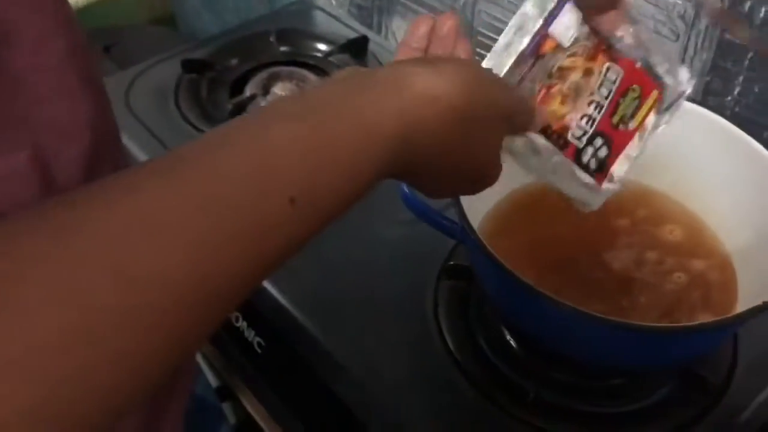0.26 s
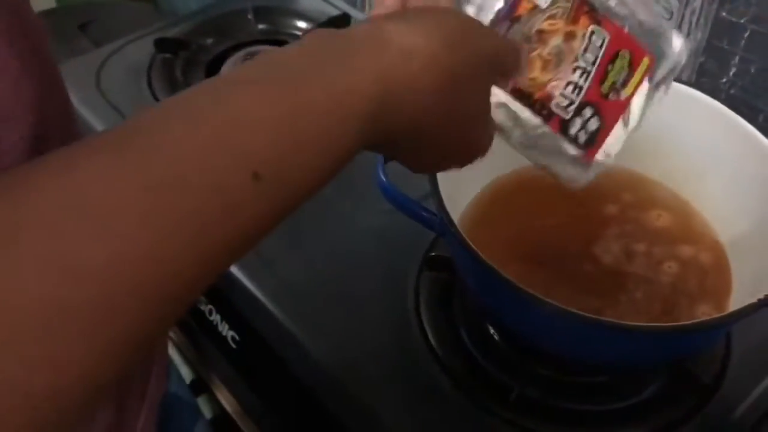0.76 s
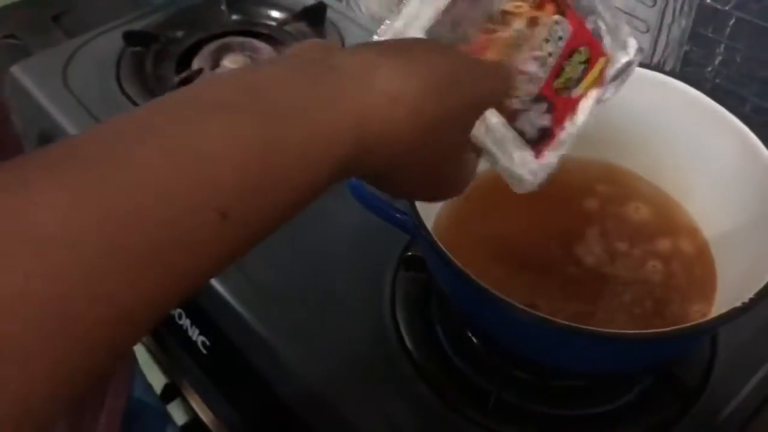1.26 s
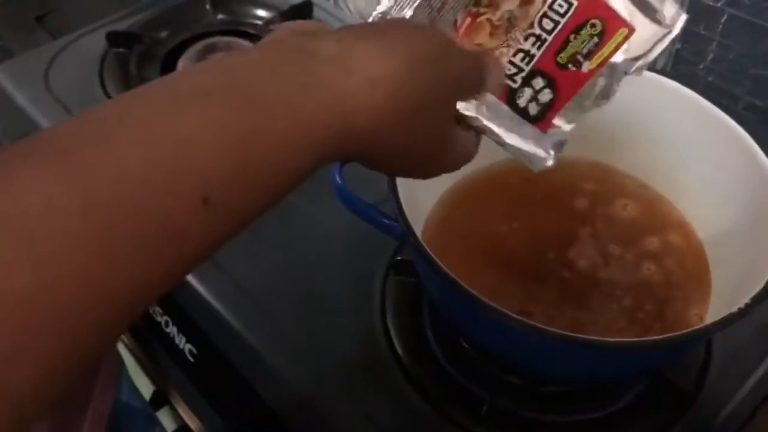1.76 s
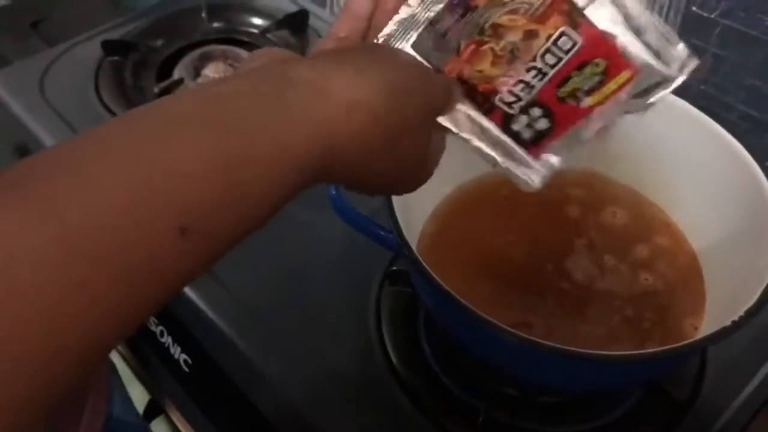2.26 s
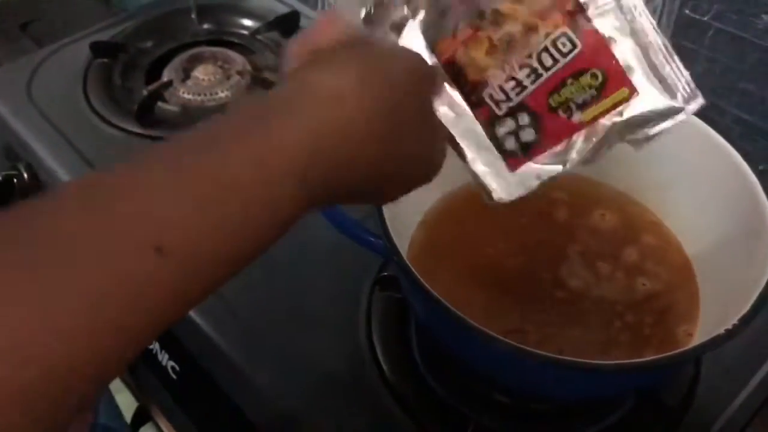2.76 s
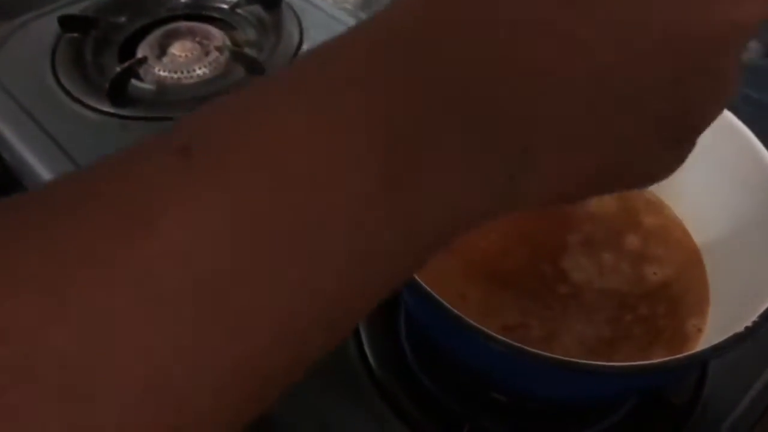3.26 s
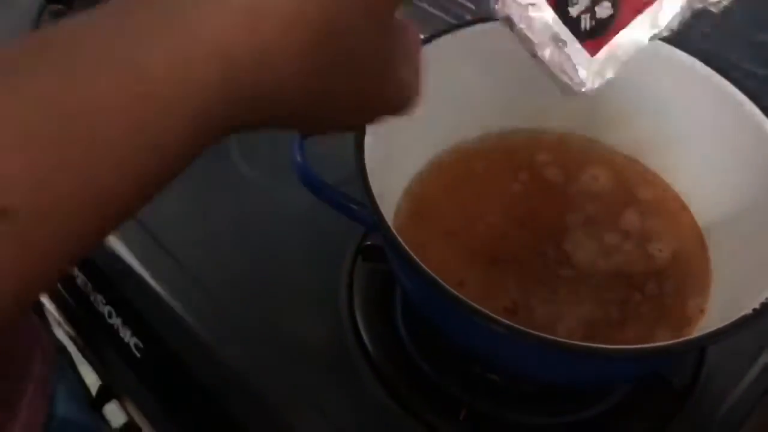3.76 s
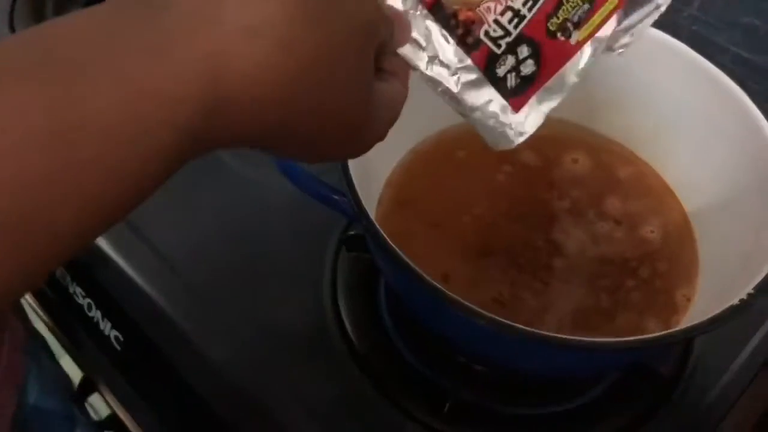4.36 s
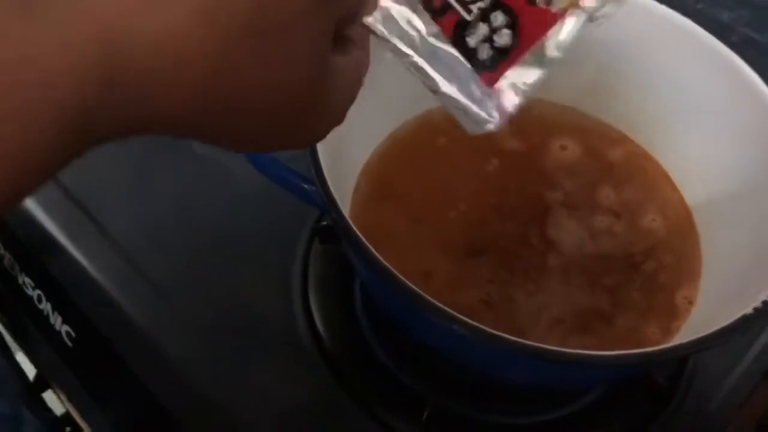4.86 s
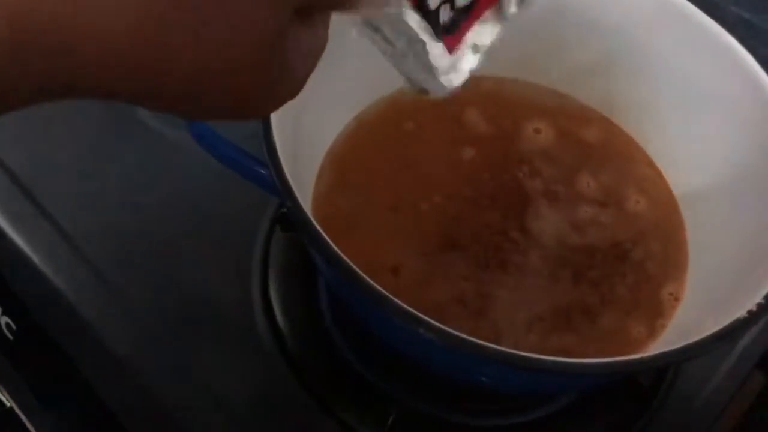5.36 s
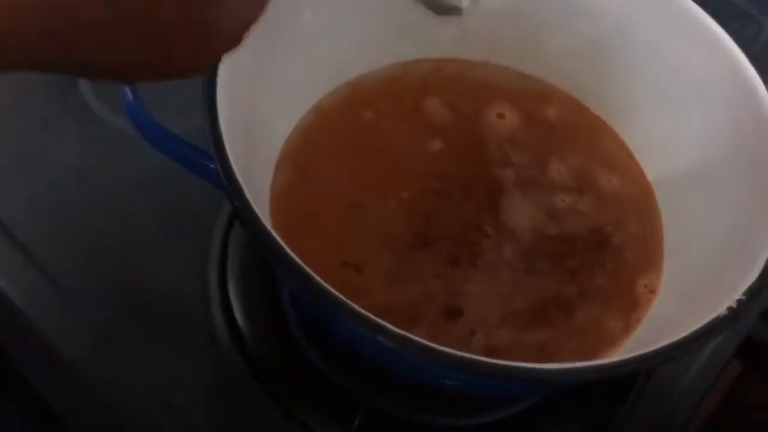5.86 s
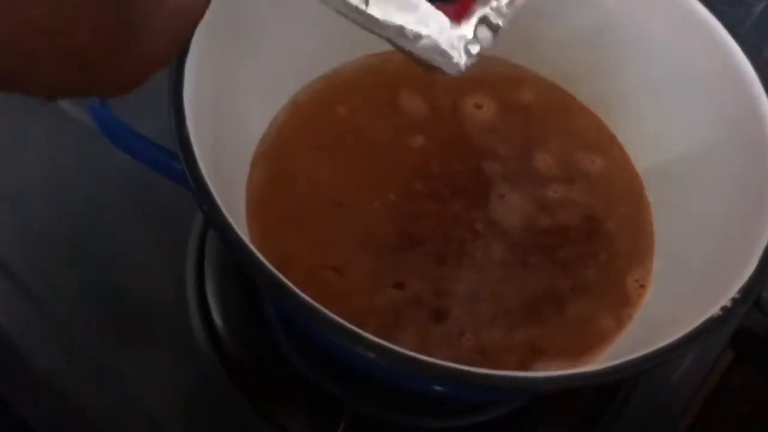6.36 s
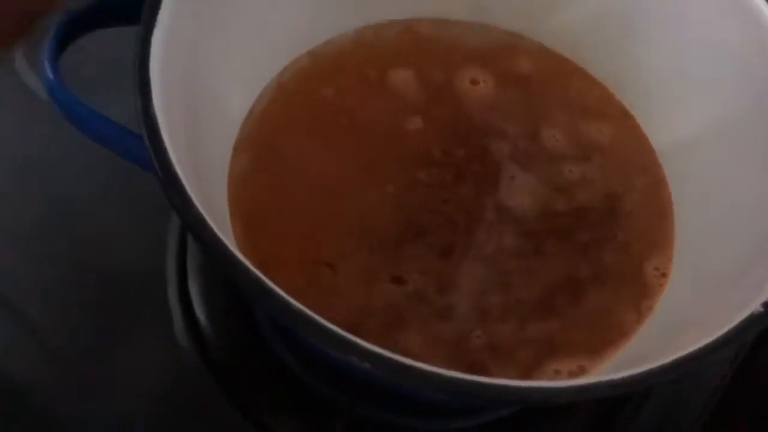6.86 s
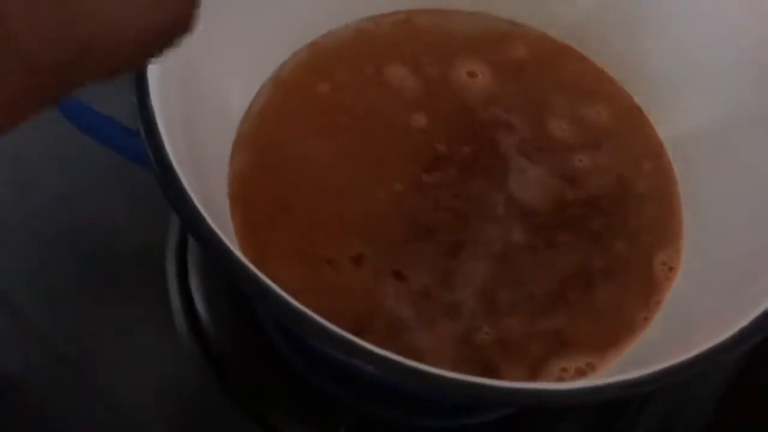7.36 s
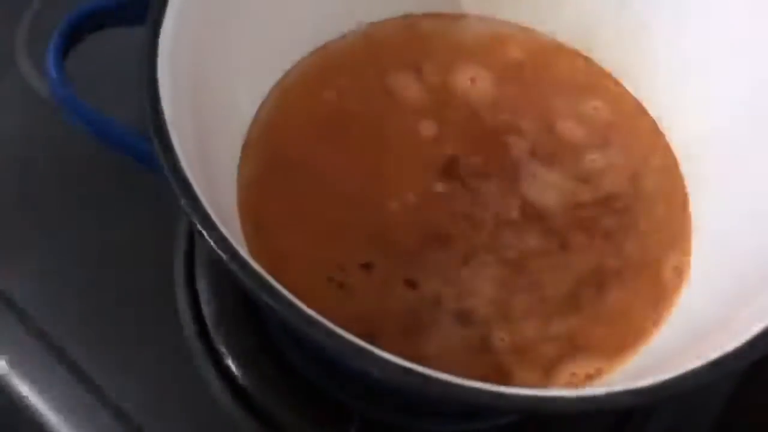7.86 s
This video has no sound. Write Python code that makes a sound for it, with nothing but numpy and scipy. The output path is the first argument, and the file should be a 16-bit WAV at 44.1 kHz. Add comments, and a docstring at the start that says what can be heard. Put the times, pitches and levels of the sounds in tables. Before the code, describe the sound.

Crisp metallic foil crackling as a sachet is squeezed and shaken, peaking in hard snaps before fading to a steady, low fan hum.

```python
"""Small kitchen, a phone's microphone close to a foil sachet squeezed and shaken over an open pot.
From first to last a fan hums on the mains, with faint shaft tones and a soft noise of moving air.
For the first 4 s creases in the foil buckle in sharp snaps over tiny crackles; hard walls add a short tail.
The pot's low answer sinks towards 4 s and is back by 4.6 s; most of the hardest snaps follow, up to 7 s.
Then only a few weak snaps and thin crackles are left over the fan."""
import sys
import numpy as np
from scipy import signal
from scipy.fft import rfft, irfft
from scipy.io import wavfile
from scipy.ndimage import uniform_filter1d

SR = 44100
rng = np.random.default_rng(int(sys.argv[2]) if len(sys.argv) > 2 else 0)


def inscribe(sig):
    """Save sig as 16-bit PCM at rate SR to the path in sys.argv[1].

    A 1-D sig is mono; a 2-D sig holds one channel per row.
    Samples are clipped to [-1, 1] before scaling.
    """
    pcm = np.round(np.clip(np.atleast_2d(sig).T, -1, 1) * 32767)
    wavfile.write(sys.argv[1], SR, pcm.astype(np.int16))


def ratio(d):
    """dB to gain"""
    e = np.asarray(d, float) / 20
    return 10 ** e


N = 357651
T = np.arange(N) / SR
TOP_HZ = 15900  # top of the microphone's band, and the highest patch pitch


def resonance(f, hz, width):
    """Response of a damped resonator, gain 1 at its centre."""
    return 1j * f * width / (hz ** 2 - f ** 2 + 1j * f * width + 1e-9)


def curve(points):
    """Straight lines through (time, level) points, as a gain over the whole scene."""
    return ratio(np.interp(T, *np.transpose(points)))


def walk(rate):
    """Random levels held 1 / rate s and slewed twice; spread near 1."""
    hold = int(SR / rate)
    steps = np.repeat(rng.standard_normal(N // hold + 1), hold)
    return 1.56 * uniform_filter1d(uniform_filter1d(steps, hold), hold)[:N]


# mains tones of the fan: (pitch [Hz], rms level at the start [dB], change [dB per s])
MAINS_TONES = [(99.97, -42, -.1), (299.9, -50.5, -.8)]


def mains_hum():
    """Mains-driven tones of steady pitch whose levels drift down slowly."""
    tones = 0
    for hz, db, change in MAINS_TONES:
        tones = tones + ratio(db + change * T) * np.sin(2 * np.pi * (hz * T + rng.random()))
    return np.sqrt(2) * tones


# overtones of the turning shaft: (multiple of the turn rate, rms level before swing and swell [dB])
SHAFT_TONES = [(8, -55), (12, -60), (14, -61), (16, -61), (20, -63), (22, -64)]
# slow growth of the shaft tones: (time [s], level [dB])
SHAFT_SWELL = [(0, -2), (8.1, 2)]


def shaft_tones():
    """Overtones locked to one turning shaft: its speed wanders, each tone's level swings by itself."""
    turns_per_s = 18.64 * (1 + 0.00139 * walk(1.972))
    turns = np.cumsum(turns_per_s) / SR
    tones = 0
    for multiple, db in SHAFT_TONES:
        swing_db = 1.9 * walk(2.355)
        tones = tones + ratio(db + swing_db) * np.sin(2 * np.pi * (multiple * turns + rng.random()))
    return np.sqrt(2) * tones * curve(SHAFT_SWELL)


# spectral shape of the room and fan noise: (frequency [Hz], relative density [dB per Hz])
AIR_SHAPE = [(18, -69), (30, -24.5), (70, -11.5), (81, -17), (103, -6.5), (124, -12), (153, -9),
             (319, -12.5), (600, -15), (889, -19.5), (1130, -25.5), (1500, -30), (3500, -37), (16000, -49)]
# unsteady middle of that noise: (centre [Hz], width [Hz], spread [dB], changes [per s])
AIR_FLICKER = (750, 1700, 2.03, 7)
# slow rise and fall of that noise: (time [s], level [dB])
AIR_SWELL = [(0, -1), (3.5, 0), (4.8, 1), (6.6, 0.7), (7.6, -1.4)]


def air():
    """Smooth noise of the room and the fan's airflow, its middle band flickering on its own."""
    shape_hz, shape_db = np.transpose(AIR_SHAPE)
    f = np.fft.rfftfreq(N, 1 / SR) + 1
    gain = ratio(np.interp(np.log(f), np.log(shape_hz), shape_db))
    noise = irfft(rfft(rng.standard_normal(N)) * gain, N)
    hz, width, spread_db, rate = AIR_FLICKER
    middle = irfft(rfft(noise) * resonance(f, hz, width), N)
    noise = noise + middle * (ratio(spread_db * walk(rate)) - 1)
    noise = noise * ratio(-45) / np.sqrt(np.mean(noise ** 2))  # rms before the wander and the swell
    return noise * ratio(0.4 * walk(0.85)) * curve(AIR_SWELL)


# tail off the kitchen walls, by band: (centre [Hz], t60 [s], relative level [dB])
WALL_BANDS = [(1500, 0.39, 2), (4000, 0.3, 1), (7550, 0.32, -5), (13000, .1, -8)]


def kitchen(foil):
    """Hard walls return a diffuse tail, built from noise bands that each die at their own pace."""
    t = T[:SR // 2]
    f = np.fft.rfftfreq(len(t), 1 / SR)
    tail = 0
    for hz, t60, db in WALL_BANDS:
        spectrum = rfft(rng.standard_normal(len(t))) * resonance(f, hz, 1.06 * hz) ** 2
        tail = tail + irfft(spectrum) * ratio(db - 60 * t / t60)
    tail = tail * (1 - np.exp(-t / 0.0073))  # echoes build up over a few ms
    tail = tail * ratio(-16.5) / np.sqrt(np.sum(tail ** 2))
    return signal.fftconvolve(foil, tail)[:N]


# band in which the pot answers: (low edge [Hz], high edge [Hz])
POT_BAND = (434, 1200)
# the pot's answer to the foil above it: (time [s], level [dB])
POT_ANSWER = [(0, -2.5), (4.0, -14), (4.6, 2), (6.5, -0.5)]


def pot(foil):
    """The open pot below lends the foil a short low body, a broad band of changing strength."""
    band = signal.butter(1, POT_BAND, "band", fs=SR, output="sos")
    return signal.sosfilt(band, foil) * curve(POT_ANSWER)


# how the sachet is handled:
# (time [s], base level of the crackles [dB], base share of the air pocket in each crease [dB])
HANDLING = [(0, -50.5, 3.5), (.83, -53.5, -6.5), (1.22, -47, 7), (1.45, -53.5, -0.5), (1.99, -51, -6.5),
            (2.66, -50, -3), (2.82, -67, -12), (3.15, -47, -7.5), (3.5, -51, -2), (3.75, -75, -5),
            (4.09, -61, -3.5), (4.3, -51, -11), (4.97, -54.5, -6.5), (5.38, -63, -5.5), (5.6, -48.5, -5.5),
            (5.87, -56.5, -11), (6.08, -44.5, -9), (6.46, -54, -1.5), (6.84, -71, -1.5), (7.05, -65, -6),
            (7.36, -63, -2.5), (8.11, -69, -32)]


def handling(s, column):
    """A column of the handling curve at the given moments."""
    return np.interp(s, *np.transpose(HANDLING)[[0, column]])


# air inside the sachet: (centre [Hz], width [Hz], level added to its share [dB])
AIR_POCKET = (1710, 555, 5.74)
# the sachet's broad faces: (centre [Hz], width [Hz], level [dB])
FACES = [(783, 1400, -7.5), (3700, 8300, -2.5)]
# first crack of a crease: (centre [Hz], width [Hz], level for a middling snap [dB], t60 [s])
CRACK = (9000, 12000, -9, 0.036)
MIDDLING_DB, MIDDLING_HZ = -28, 4000  # the middling snap from which hardness and pitch are counted


def foil_body(f, hz, pocket_db):
    """Parallel resonances of each crease: its facet, small patches, the broad faces, the air pocket."""
    facet = resonance(f, hz, 0.31 * hz) ** 2
    faces = sum(ratio(db) * resonance(f, face_hz, width) ** 2 for face_hz, width, db in FACES)
    # four patches, scattered in octaves about the facet's pitch
    patch_hz = np.minimum(hz * 2 ** (0.44 * rng.standard_normal((len(hz), 4))), TOP_HZ)
    patches = sum(resonance(f, p[:, None], 0.14 * p[:, None]) for p in patch_hz.T)
    pocket_hz, pocket_width, pocket_gain_db = AIR_POCKET
    pocket = ratio(pocket_db + pocket_gain_db) * resonance(f, pocket_hz, pocket_width)
    return facet + faces + ratio(-0.5) * patches + pocket


def buckle(s, db, hz, pocket_db, t60, size, edge_db=CRACK[2]):
    """Each crease cracks, then lets go in a ragged, dying run of slips that rings the foil's body."""
    t, f = np.arange(size) / SR, np.fft.rfftfreq(size, 1 / SR)
    db, hz, pocket_db = db[:, None], hz[:, None], pocket_db[:, None]
    t60 = np.clip(t60, .003, .2)[:, None]

    # a slow crunch swells in, a quick snap starts at once
    quick = np.minimum(0.037 / t60, 1) ** 2
    onset = 1 - quick * np.exp(-t / .0001) - (1 - quick) * np.exp(-t / (0.034 * t60))
    fade = onset * ratio(-60 * t / t60) * np.cos(np.pi / 2 * t / t[-1])

    # slips of uneven strength, under a millisecond apart; slow crunches are the most uneven
    slip_samples = 32
    ragged_db = 4 * (1.42 - 0.56 * quick)
    slips = ratio(ragged_db * rng.standard_normal((len(s), size // slip_samples)))
    slips = np.repeat(slips, slip_samples, axis=1)

    # harder snaps open with a harder kick; larger, lower facets crack more dully
    noise = rng.standard_normal((len(s), size))
    noise[:, :1] = 4.5 * ratio(0.67 * np.maximum(db - MIDDLING_DB, 0))
    crack_hz, crack_width, _, crack_t60 = CRACK
    edge_db = edge_db + 7.5 * np.log2(hz / MIDDLING_HZ)
    crack = noise * quick * ratio(edge_db - 60 * t / crack_t60)

    rung = rfft(noise * slips * fade + crack) * foil_body(f, hz, pocket_db)
    rung = rung + rfft(crack) * resonance(f, crack_hz, crack_width)

    # the treble of a crease dies sooner, most of all in quick snaps
    high = rung / (1 + (6660 / (f + 1)) ** 4)
    treble_fade = ratio(-60 * np.sqrt(quick) * t / 0.034)
    rows = irfft(rung - high, size) + irfft(high, size) * treble_fade
    rows = rows * np.minimum((t[-1] - t) / .006, 1) ** 2  # each crease ends in silence

    # the level sets each crease's energy against that of its fade
    energy_ratio = np.sum(fade ** 2, axis=1) / np.sum(rows ** 2, axis=1)
    rows = rows * ratio(db) * np.sqrt(energy_ratio)[:, None]
    out = np.zeros(N + size)
    start = np.clip((s * SR).astype(int), 0, N - 1)
    np.add.at(out, start[:, None] + np.arange(size), rows)
    return out[:N]


def crackle():
    """2000 small creases at random moments, some larger than the rest, as strong as the handling."""
    when, strength, pitch, share, length = rng.random((2000, 5)).T
    s = when * N / SR
    db = handling(s, column=1) - 4 + np.minimum(-3.0 * np.log(1 - strength), 10.5)
    hz = 2200 * 2 ** (1.21 * pitch)
    pocket_db = handling(s, column=2) - 5 + 11 * share
    return buckle(s, db, hz, pocket_db, t60=0.023 + 0.05 * length, size=768, edge_db=-24)


# loud buckling creases: (time [s], level [dB], facet pitch [Hz], t60 [s], held to 0.2 s at most)
SNAPS = [(0.0622, -39, 1900, 0.031), (0.072, -28, 2400, 0.084), (.099, -22, 6230, 0.024),
         (0.2135, -35.5, 1800, 0.021), (.2437, -31, 4000, 0.025), (0.25, -30.5, 2460, 0.063),
         (.424, -29.5, 2400, 0.052), (0.4826, -23.5, 4600, 0.03), (.392, -39, 2480, 0.042),
         (.5546, -37.5, 1600, 0.028), (0.565, -33, 2030, .2), (0.582, -29, 2820, 0.094),
         (0.654, -32, 3000, 0.083), (0.7644, -24, 4130, 0.0093), (0.7644, -32.5, 2480, 0.24),
         (0.835, -33, 2230, 0.15), (0.9578, -36, 3900, .02), (0.9612, -30.5, 1550, 0.036),
         (.9686, -31, 3200, 0.054), (0.772, -41, 2380, 0.022), (.86, -37, 2440, 0.11),
         (0.9812, -31.5, 1550, 0.044), (0.9983, -26, 1520, 0.026), (1.085, -39.5, 2500, 0.059),
         (1.159, -21, 3840, 0.066), (1.172, -28, 3620, 0.058), (1.2038, -32, 3000, 0.03),
         (1.3029, -25.5, 3240, 0.041), (1.319, -33, 3600, 0.02), (1.3657, -25.5, 2770, 0.021),
         (1.3752, -25.5, 3160, 0.013), (1.3846, -30, 2440, 0.029), (1.394, -36, 1630, 0.022),
         (1.589, -33.5, 4970, .022), (1.617, -27, 3300, 0.014), (1.6325, -24.5, 6100, 0.021),
         (1.707, -24.5, 6300, 0.022), (1.8156, -32, 5700, 0.057), (1.838, -15, 6600, 0.015),
         (1.872, -36, 3600, 0.023), (1.8922, -34.5, 3430, 0.065), (1.9348, -23.5, 3900, 0.017),
         (1.9903, -17, 6900, 0.016), (1.96, -37, 3450, 0.072), (2.015, -36, 6810, 0.021),
         (2.0435, -29.5, 9300, 0.015), (2.0984, -26.5, 5200, 0.015), (2.1215, -37, 3450, .023),
         (2.146, -34, 4500, 0.046), (2.1521, -21.5, 3700, 0.049), (2.2335, -29.5, 7440, 0.018),
         (2.2399, -24, 7160, 0.017), (2.3064, -27, 6600, 0.017), (2.3468, -31, 3680, 0.091),
         (2.356, -27.5, 3600, 0.022), (2.3843, -37, 7900, 0.018), (2.397, -38, 3040, .02),
         (2.414, -23.5, 3920, 0.02), (2.4493, -23.5, 4250, 0.022), (2.4655, -26, 4740, 0.014),
         (2.069, -35, 4820, .026), (2.478, -40, 4300, 0.023), (2.503, -33.5, 4040, 0.016),
         (2.5508, -31.5, 4560, 0.016), (2.637, -33, 3600, 0.033), (2.6638, -36, 3270, 0.022),
         (2.6748, -29.5, 6850, 0.027), (2.7517, -20.5, 6700, 0.023), (2.781, -36, 3730, 0.035),
         (2.9728, -40, 5700, 0.024), (3.003, -37, 1600, 0.18), (3.017, -30.5, 3050, 0.22),
         (3.0259, -33, 2960, 0.019), (3.0335, -32, 6630, 0.02), (3.059, -34, 7060, .025),
         (3.1236, -37, 8400, 0.022), (3.138, -37, 3410, 0.027), (3.1806, -31.5, 2860, 0.023),
         (3.1886, -29, 6150, 0.05), (3.2102, -29, 6360, .03), (3.2402, -35.5, 2190, 0.046),
         (3.296, -26.5, 2200, 0.041), (3.3187, -29.5, 4970, 0.04), (3.393, -28.5, 2100, 0.065),
         (3.4217, -21.5, 7260, 0.028), (3.427, -26, 2180, 0.027), (3.651, -30, 6350, 0.015),
         (3.7652, -29, 7200, 0.037), (3.7855, -33, 4870, .02), (3.8079, -32, 5600, 0.13),
         (3.8191, -27, 5630, 0.066), (3.849, -33.5, 3360, 0.053), (3.879, -32.5, 6300, 0.039),
         (3.9964, -29, 7800, 0.018), (4.0372, -31, 6000, 0.025), (4.051, -27, 6100, 0.023),
         (4.063, -35, 7450, .02), (4.0724, -34, 5370, 0.024), (4.112, -38.5, 4740, 0.03),
         (4.1963, -28.5, 5400, 0.082), (4.203, -28.5, 1090, 0.032), (4.308, -32, 5650, 0.052),
         (4.3181, -19, 5800, 0.01), (4.323, -28.5, 5600, .022), (4.328, -30, 5460, 0.059),
         (4.3476, -33.5, 3360, 0.07), (4.3738, -24, 3950, 0.0094), (4.4441, -29, 5540, .028),
         (4.512, -22.5, 6200, 0.018), (4.5198, -23.5, 6440, 0.021), (4.536, -24, 4140, 0.012),
         (4.546, -32, 3450, 0.014), (4.654, -27.5, 5630, 0.019), (4.6785, -35, 3200, 0.017),
         (4.6822, -25.5, 3130, 0.02), (4.6918, -28, 5800, 0.045), (4.709, -29.5, 3310, 0.023),
         (4.7213, -36, 1500, 0.023), (4.7365, -26.5, 5800, 0.017), (4.7809, -14.5, 8200, 0.011),
         (4.7848, -31.5, 5530, 0.11), (4.817, -27.5, 3270, 0.022), (4.8284, -35, 3030, .02),
         (4.8388, -32, 3180, 0.021), (4.8622, -26.5, 3670, 0.016), (4.8729, -31, 3810, .017),
         (4.8816, -33, 3860, 0.037), (4.8989, -24, 6100, 0.021), (4.957, -39, 5700, 0.033),
         (4.968, -37, 3190, 0.061), (4.9807, -22.5, 5500, 0.06), (5.005, -25.5, 3030, 0.022),
         (5.0525, -24, 4550, 0.023), (5.057, -27.5, 3700, 0.18), (5.0847, -29, 5800, 0.027),
         (5.1032, -27, 6300, 0.014), (5.1299, -20, 4530, 0.013), (5.169, -21.5, 4700, 0.017),
         (5.1814, -29.5, 4860, 0.071), (5.2125, -33, 4050, .025), (5.218, -27.5, 3000, 0.045),
         (5.2685, -25, 2960, 0.016), (5.2762, -26, 5300, 0.076), (5.2813, -28.5, 3800, 0.085),
         (5.3306, -31, 2010, 0.013), (5.381, -32, 3770, 0.16), (5.3966, -32.5, 5370, 0.068),
         (5.5029, -29, 5550, 0.062), (5.5555, -25, 2500, 0.017), (5.571, -29, 2590, 0.021),
         (5.5822, -26.5, 7700, 0.018), (5.6226, -23, 5800, 0.045), (5.651, -23, 5470, 0.038),
         (5.706, -36.5, 3700, 0.021), (5.7569, -26.5, 4400, 0.1), (5.7675, -27, 4250, 0.014),
         (5.774, -26, 5500, 0.033), (5.7831, -28.5, 5460, 0.018), (5.9036, -23, 5800, 0.023),
         (5.91, -32.5, 2750, 0.095), (5.921, -33, 2690, 0.019), (5.9358, -22.5, 9400, .023),
         (5.951, -24.5, 6180, 0.019), (5.961, -23, 9200, 0.024), (6.0023, -36, 2580, .025),
         (6.0205, -36, 3800, .025), (6.0573, -33.5, 3760, .036), (6.0817, -20.5, 4600, 0.017),
         (6.0972, -19.5, 6540, 0.022), (6.164, -13.5, 6800, 0.025), (6.2958, -33, 3950, 0.068),
         (6.3013, -27.5, 5070, 0.034), (6.3631, -31.5, 4800, 0.063), (6.3862, -31.5, 3420, 0.033),
         (6.4196, -34.5, 3450, 0.017), (6.4759, -15.5, 5300, 0.018), (6.508, -19, 3930, 0.02),
         (6.549, -22, 4950, 0.11), (6.8012, -43, 1640, 0.018), (6.8091, -32, 4750, 0.042),
         (6.816, -18, 4600, 0.012), (6.8238, -16.5, 5800, 0.017), (6.8372, -31.5, 3000, 0.019),
         (6.9349, -31.5, 4000, 0.048), (6.9407, -26.5, 3040, 0.029), (6.9515, -12.5, 5900, 0.01),
         (6.9784, -25, 3860, 0.019), (6.9941, -16.5, 4740, 0.021), (7.0297, -30, 4030, 0.02),
         (7.0709, -37, 1800, 0.017), (7.095, -29.5, 3370, 0.048), (7.1023, -20.5, 3620, 0.025),
         (7.1102, -43, 3400, 0.013), (7.12, -29, 3250, 0.015), (7.283, -44, 6000, .012),
         (7.344, -44, 5000, .012), (7.3887, -30.5, 4000, 0.029), (7.724, -43.5, 3430, 0.043),
         (7.7659, -38, 2730, 0.022), (7.78, -34, 3500, 0.063), (8.057, -40.5, 3420, 0.11)]


def snaps():
    """The loud creases; the air pocket's share drops for harder snaps and for smaller pitch of facet."""
    s, db, hz, t60 = np.transpose(SNAPS)
    hardness_db = -0.87 * (db - MIDDLING_DB)
    pitch_db = 3 * np.log2(hz / MIDDLING_HZ)
    scatter_db = 2.5 * rng.standard_normal(len(s))
    pocket_db = handling(s, column=2) + hardness_db + pitch_db + scatter_db
    return buckle(s, db, hz, pocket_db, t60, size=2048)


def scene():
    """The kitchen and its fan behind, the foil over the pot close to the microphone."""
    foil = crackle() + snaps()
    fan = mains_hum() + shaft_tones() + air()
    return (fan + kitchen(foil) + pot(foil) + foil)[None]


def band_limit(x):
    """A steep low-pass at the top of the band."""
    return signal.sosfilt(signal.butter(12, 16990, fs=SR, output="sos"), x)


def record(dry):
    """The phone's microphone dulls the treble gently and cuts steeply above its top."""
    dull = signal.sosfilt(signal.butter(1, 11000, fs=SR, output="sos"), dry)
    mix = signal.sosfilt(signal.cheby1(6, .5, TOP_HZ, fs=SR, output="sos"), dull)
    return band_limit(mix)


dry = scene()
out = record(dry)
inscribe(out)
```